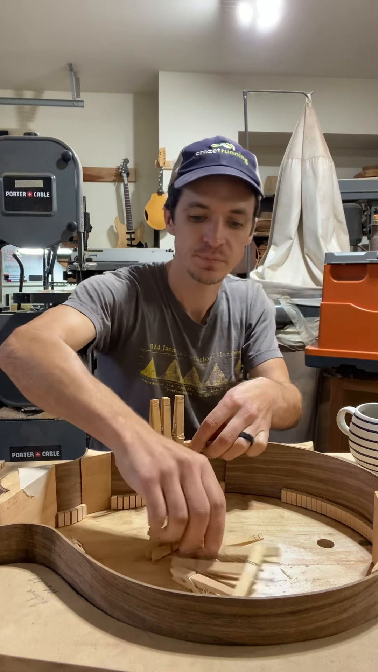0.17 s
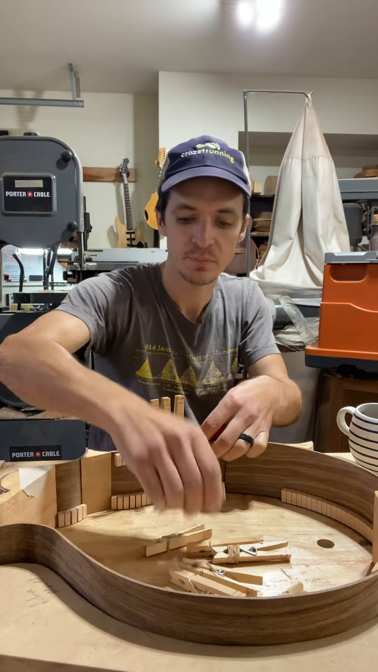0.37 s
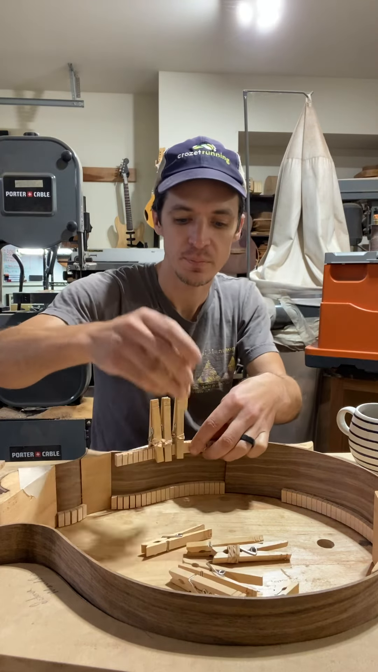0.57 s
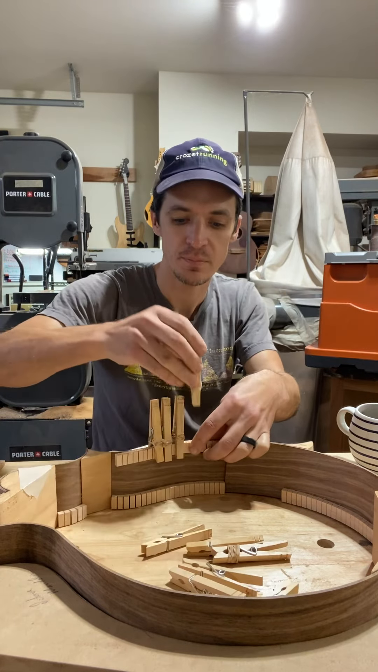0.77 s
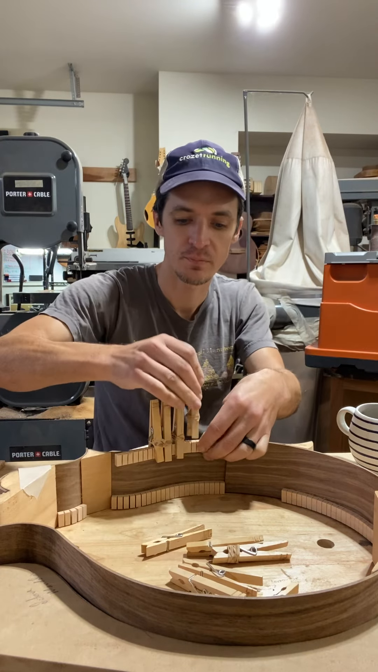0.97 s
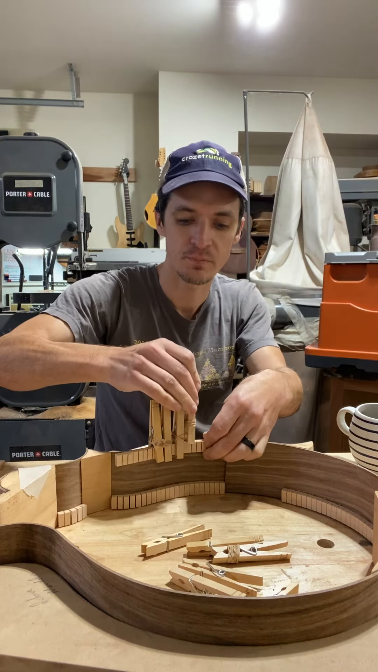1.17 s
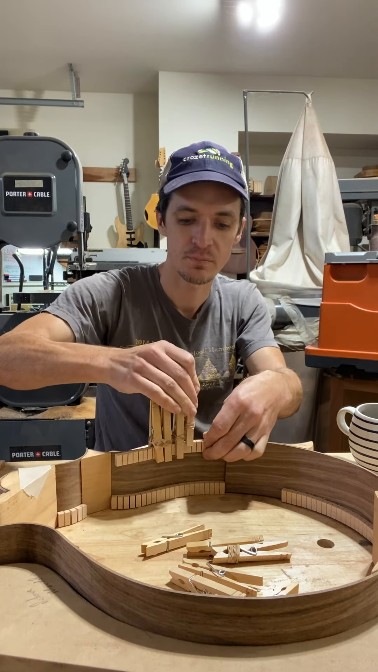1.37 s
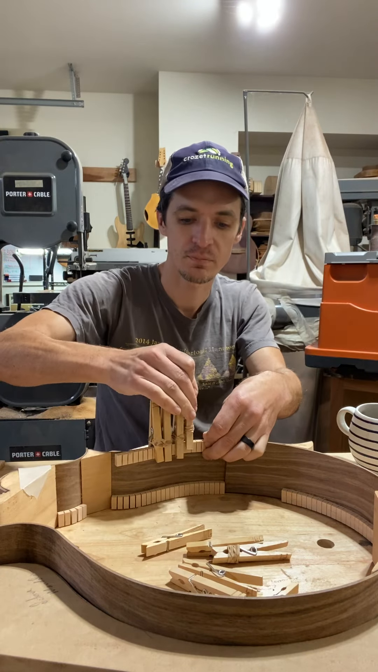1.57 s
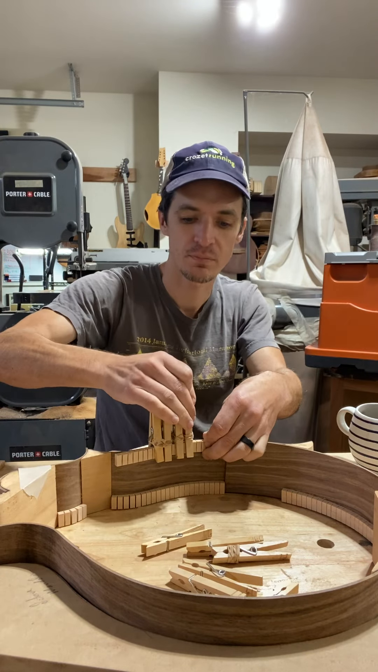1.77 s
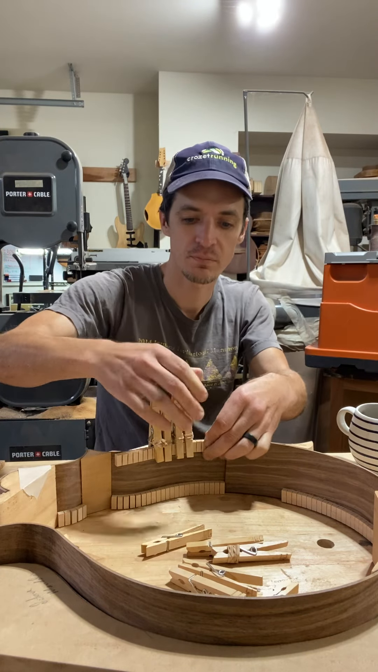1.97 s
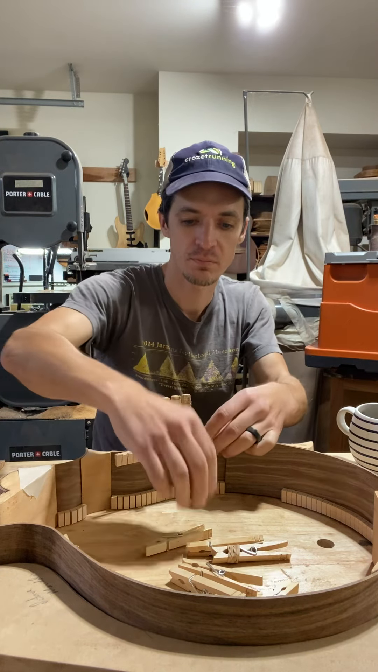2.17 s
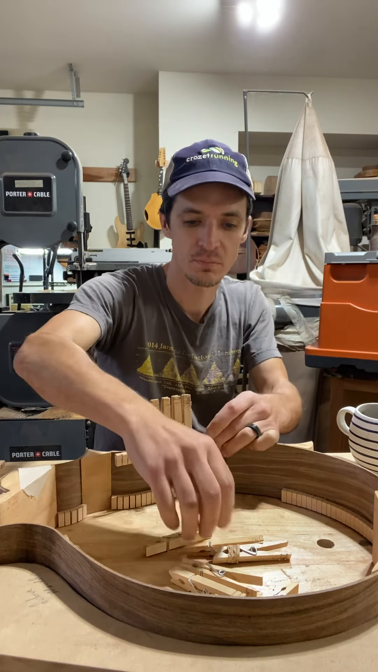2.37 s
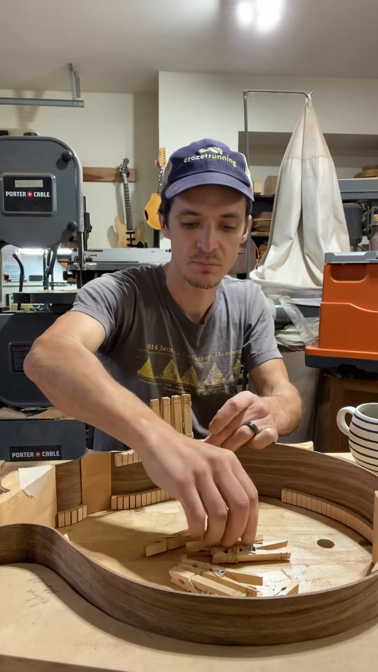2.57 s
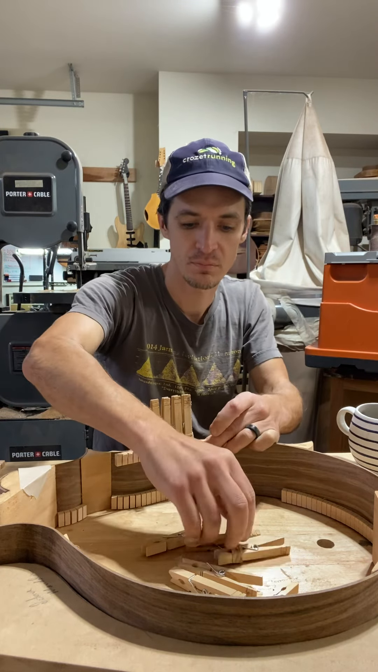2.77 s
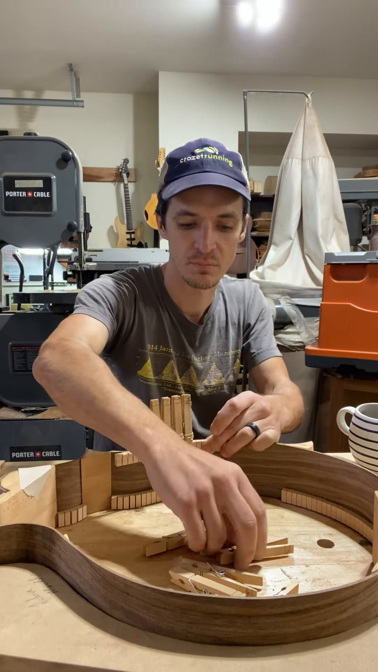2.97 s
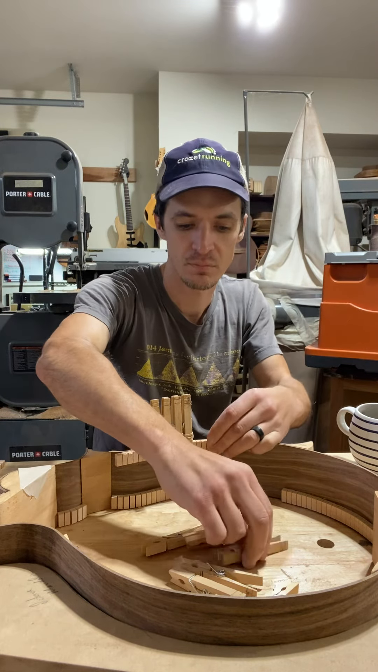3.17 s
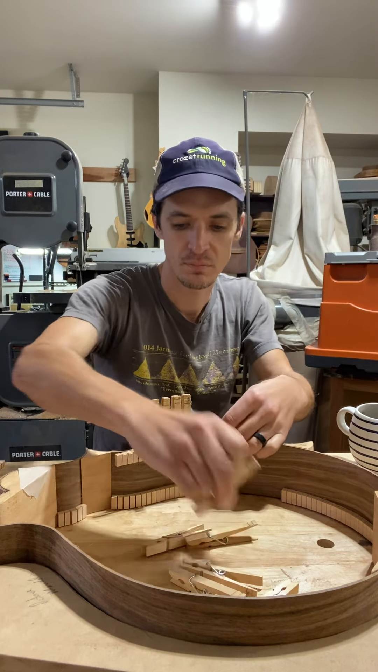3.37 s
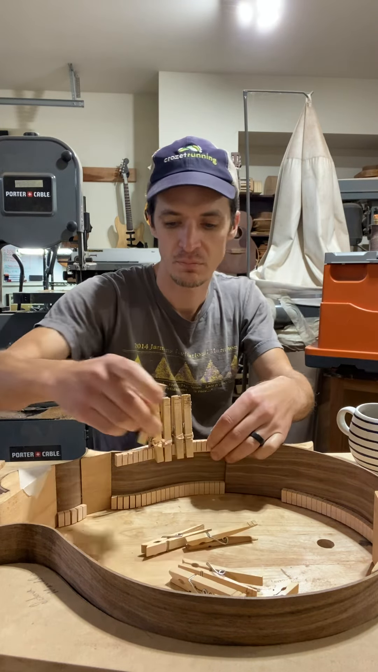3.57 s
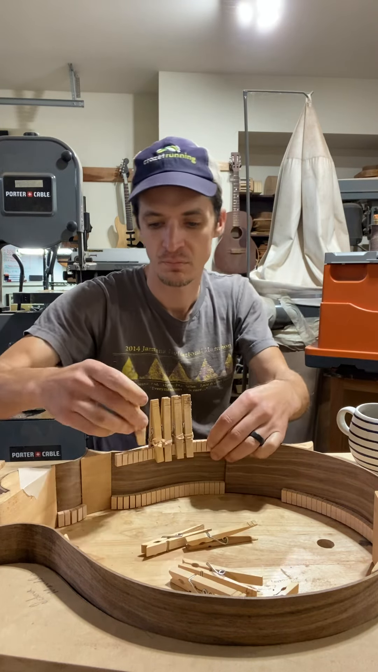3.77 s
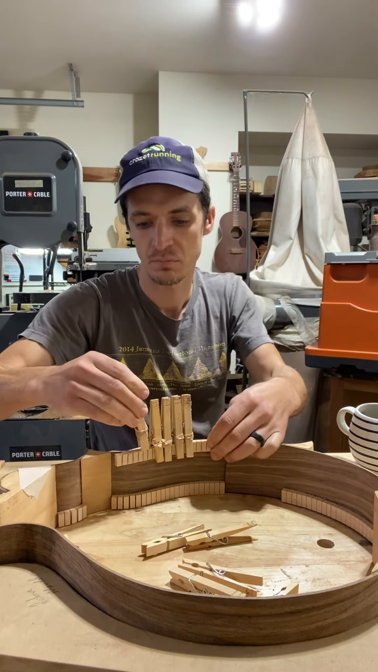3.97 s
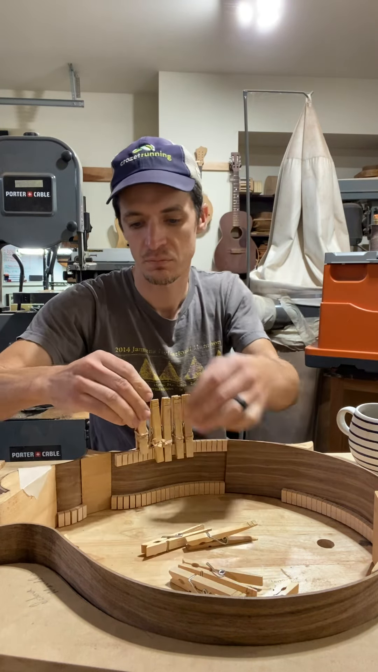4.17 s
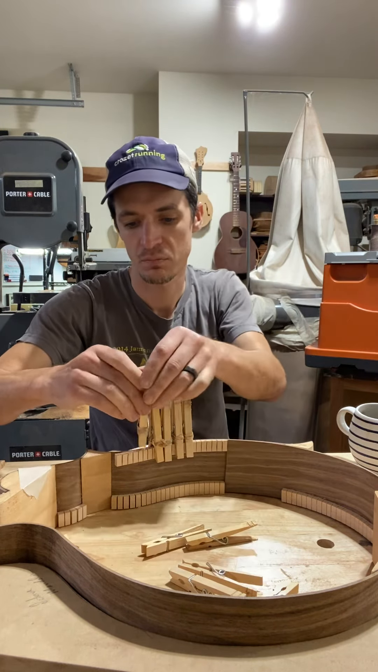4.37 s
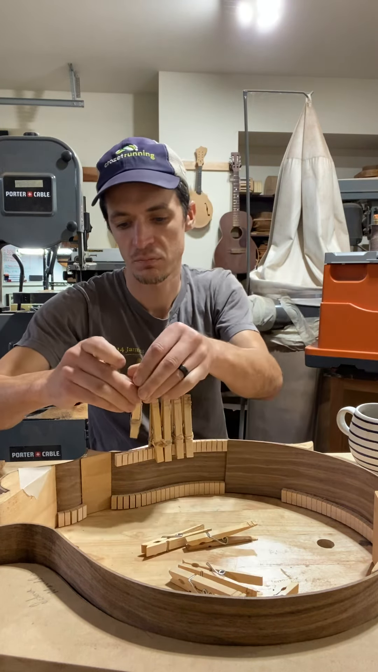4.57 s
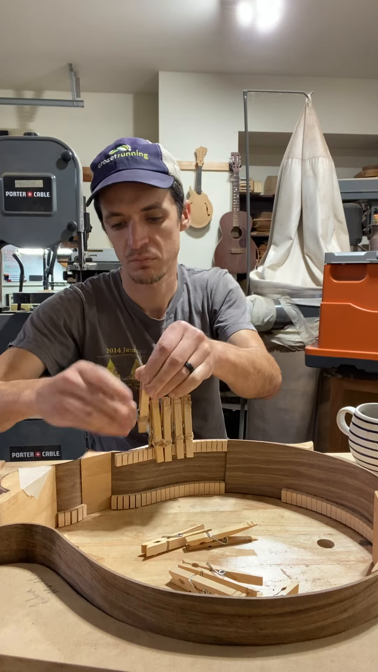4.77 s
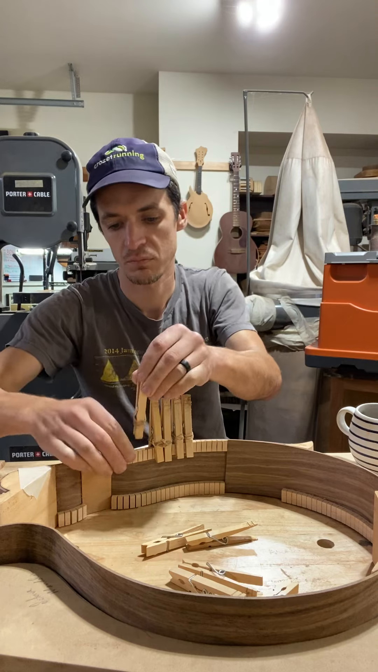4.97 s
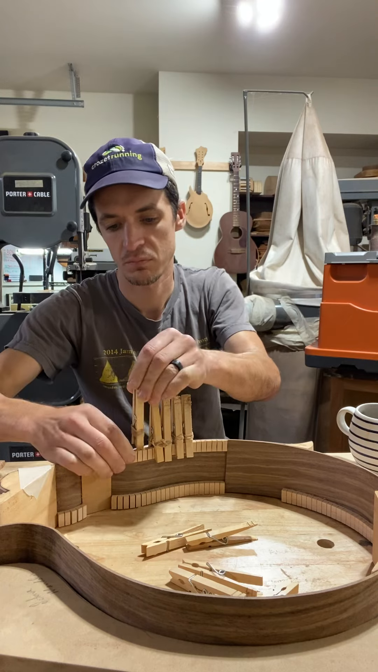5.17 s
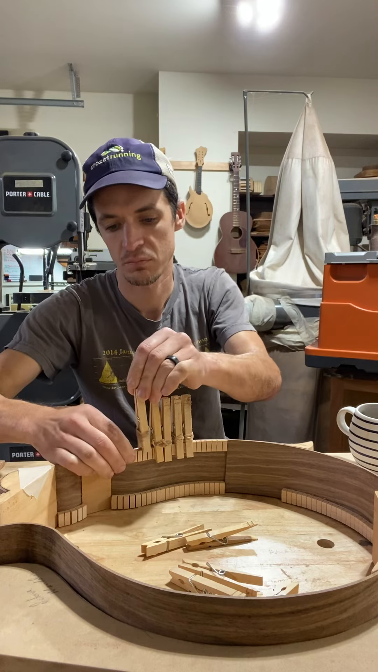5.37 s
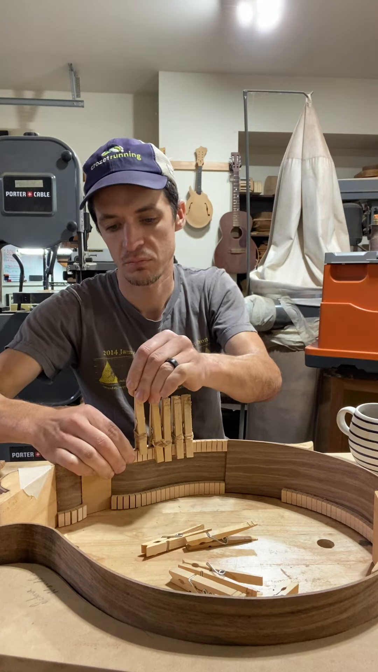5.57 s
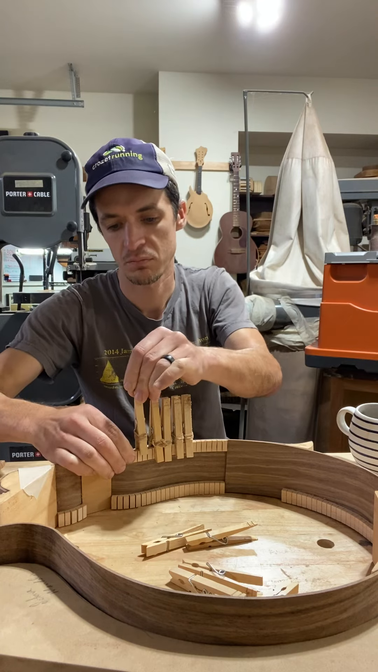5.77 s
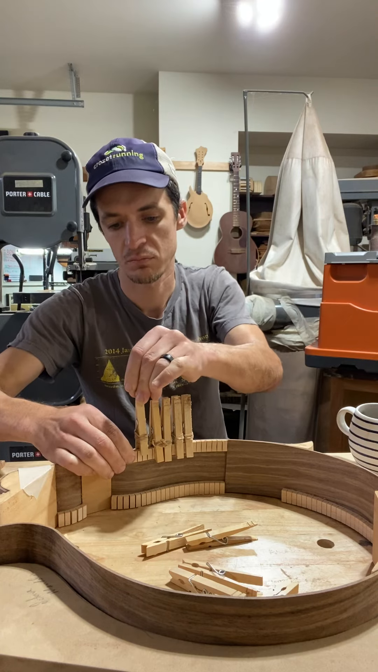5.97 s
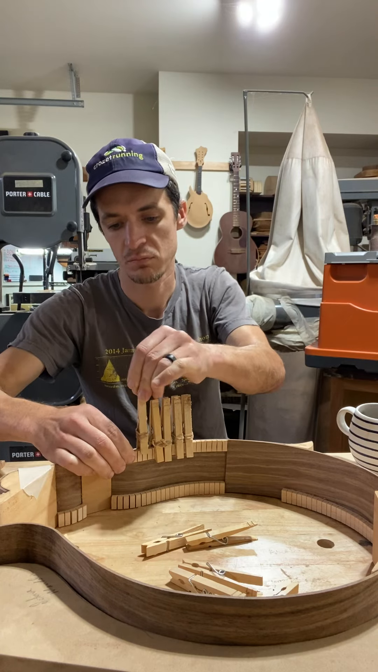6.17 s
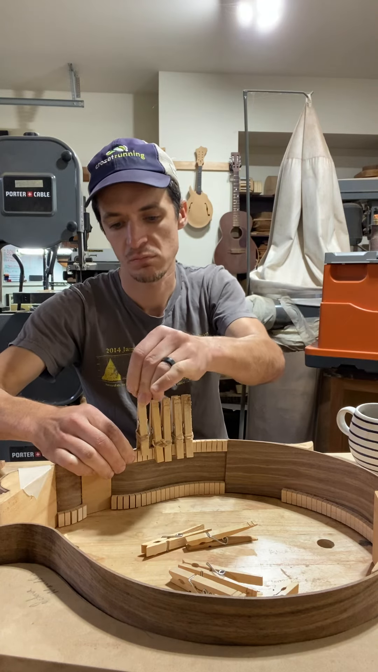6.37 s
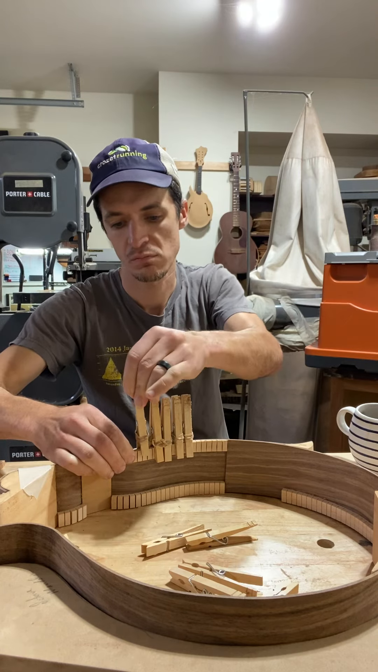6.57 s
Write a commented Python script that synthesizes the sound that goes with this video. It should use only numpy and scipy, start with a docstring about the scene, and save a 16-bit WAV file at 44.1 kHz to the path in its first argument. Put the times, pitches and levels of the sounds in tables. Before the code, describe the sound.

The sound begins abruptly with a loud, bright clatter of wooden clothespins on a thin resonant board: rapid clacks, snaps and rattling, with airy rustle, strongest around 0.1 to 0.3 s, and a smaller flurry at 0.5 to 0.6 s. Near silence follows. At 0.83 to 1.0 s a peg slides with a thin hiss, and a dull knock lands at 1.04, with lesser taps near 1.2. A sharper hissing scrape at 1.6 leads into the firmest seating knock at 1.66; soft rubs and a light tap follow around 1.9 to 2.2. From 2.56 to 3.4 pegs are rummaged again, much more quietly, with one clearer click at 2.75 and finger swishes. Small rim taps come around 4.0 and 4.25, then sparse faint scrapes, a little knock at 5.46 and barely audible touches until 6.6. Close stereo, quiet workshop, faint echoes, wavering low hum.

```python
"""In a workshop, wooden clothes pegs are picked from a pile on a thin wooden plate and pushed onto its bent rim.
Pegs clatter, rattle and scrape on the plate; on the rim they slide with a hiss and seat with a dull knock.
Blows and friction are noisy forces that ring the decaying tones (modes) of plate, rim and pegs.
Shaped, coloured noise makes bright swishes (fingers on wood or rustling clatter) and the spray of knocks.
A low hum wavers over a quiet room with faint echoes; two close microphone ports listen."""
import sys
import numpy as np
from scipy import signal
from scipy.fft import rfft, irfft
from scipy.io import wavfile

SR = 44100
rng = np.random.default_rng(int(sys.argv[2]) if len(sys.argv) > 2 else 0)


def file_out(sig):
    """Save sig as 16-bit WAV at sys.argv[1]."""
    # one column per channel
    cols = np.atleast_2d(sig).T
    # limit, then scale
    lim = np.clip(cols, -1, 1)
    pcm = np.round(lim * 32767).astype(np.int16)
    wavfile.write(sys.argv[1], SR, pcm)


N = 291942  # length in samples

# pegs knocking on the plate: start_s, blow_db, then boom_db, snap_db, tick_db relative to the blow
PLATE_KNOCKS = [(0.015, -29.5, -3, -1.5, -14), (0.049, -33, -16, -17, -4.5), (0.077, -22.5, 1, 5.5, -9),
                (0.101, -23, -4.5, 1, -3), (0.129, -27, -6, -4, -10), (0.159, -23.5, -7.5, 3, 2),
                (0.196, -34, -12, -1, 4), (0.203, -24.5, -9, 0, 3), (0.24, -16, -14.5, -1, -3),
                (0.26, -28.5, -6, -24, -15.5), (0.292, -31.5, -6, 4, 5), (0.297, -20, -11, -7, -30.5),
                (0.318, -32.5, -5.5, -24, -32), (0.355, -34, -27, -11, -35), (0.517, -37, -31, -16, -11.5),
                (0.527, -38, -4, -22, -25), (0.54, -28, -14, -14, -37), (0.561, -34, -6, 7, 1),
                (0.588, -37.5, -14, 4.5, -1), (0.616, -42.5, -7, -0.5, -23.5),
                (2.559, -44.5, -0.5, -6, -28), (2.576, -39.5, -7.5, -10.5, -30.5),
                (2.598, -48, -28, -6, -14), (2.71, -47, -8, 4, -19), (2.736, -41.5, -2.5, -6, -21),
                (2.751, -32.5, -37, 6, -3), (2.767, -42.5, -4, -11, -33), (2.78, -55, -7, 0, -19),
                (2.792, -58, -20, -14, -28), (2.81, -62, -4, -7, 3), (2.84, -52, -6, -6, -16),
                (2.918, -49.5, 7.5, -27, -19), (3.002, -35, -16, -7, -34), (3.022, -45.5, -17, 3.5, -13),
                (3.098, -54, -5, -5, -15), (3.121, -61, -19, -5, 1), (3.13, -53.5, 1.5, 3, -20),
                (3.148, -41, -28, -26, -20), (3.187, -66.5, -16, -9, 18), (3.225, -56, -19, -9, 0),
                (3.275, -39.5, -15, -38, -13)]
# ringing tones of a wooden peg: pitch_hz, level_db, t60_s (time to fall by 60 dB)
PEG_MODES = [(5980, -11, 0.0027), (6520, -4, 0.0058), (6737, -6.5, 0.007), (7040, -4, 0.0047),
             (7900, -3, 0.00249), (9300, -8, 0.002), (12280, -14.5, 0.0017)]
# colour of bright swishing and spraying noise: pitch_hz, relative level_db
BRIGHT_COLOUR = [(1200, -37.5), (2500, -9.5), (5000, 0), (8000, 8.5), (10500, 1.5), (12000, -8.5),
                 (14500, -29)]


def gain_of(db):
    """Turns decibels into a factor."""
    return 10 ** (np.asarray(db) / 20)


def evened(x):
    """Scales a sound to an average (rms) strength of 1."""
    return x / np.sqrt(np.mean(x ** 2) + 1e-20)


def read(points, hz):
    """Reads a table of pitches and values at the frequencies hz."""
    f, value = np.transpose(points)
    return np.interp(np.log(hz + 1), np.log(f + 1), value)


def add(mix, s, sound):
    """Mixes a sound in at time s."""
    part = mix[round(s * SR):][:len(sound)]
    part += sound[:len(part)]


def coloured(x, points):
    """Filters x by a table of pitch_hz and level_db."""
    hz = np.fft.rfftfreq(len(x), 1 / SR)
    return irfft(rfft(x) * gain_of(read(points, hz)), len(x))


def band(modes, lo, hi):
    """Picks the modes from lo to hi Hz."""
    return [m for m in modes if lo <= m[0] < hi]


def ring_of(modes, spread_db, detune):
    """The modes' answer to one tap: fading sines, each shifted and weighted a little by chance."""
    t = np.arange(round(SR * max(m[2] for m in modes)) + 50) / SR
    ring = np.zeros(len(t))
    for hz, db, t60 in modes:
        level_draw, pitch_draw = rng.standard_normal(2)
        fading = gain_of(db + spread_db * level_draw - 60 * t / t60)
        ring += fading * np.sin(2 * np.pi * hz * (1 + detune * pitch_draw) * t)
    return ring


def struck(modes, contact_s, spread_db, detune, rise_s, firm):
    """One blow: a firm touch within a ragged contact rings the modes, which start softly; peak 1."""
    u = np.arange(900) / SR / contact_s
    ring = ring_of(modes, spread_db, detune)
    ring = ring * (1 - np.exp(-np.arange(len(ring)) / SR / rise_s)) ** 2
    force = rng.standard_normal(len(u)) * u * np.exp(-u)
    force[round(contact_s * SR)] = firm * np.linalg.norm(force)
    sound = signal.oaconvolve(ring, force)
    return sound / abs(sound).max()


def knocks(rows, body, boom_top, boom_rise_s):
    """Each knock: the body's low modes boom, the middle ones clack, the upper ones snap, the peg ticks."""
    low, middle, upper = band(body, 0, boom_top), band(body, boom_top, 1290), band(body, 1290, 5200)
    firm_low, firm_high = 1.6, .3  # firm touch against the ragged force, for low and high modes
    out = np.zeros(N)
    for s, blow_db, boom_db, snap_db, tick_db in rows:
        clack = struck(middle, contact_s=.001, spread_db=1.5, detune=.03, rise_s=.0012, firm=firm_low)
        boom = struck(low, contact_s=.0008, spread_db=2.0, detune=.02, rise_s=boom_rise_s, firm=firm_low)
        snap = struck(upper, contact_s=.0014, spread_db=2.0, detune=.04, rise_s=.0003, firm=firm_high)
        tick = struck(PEG_MODES, contact_s=.0013, spread_db=4.0, detune=.05, rise_s=.0001, firm=firm_high)
        for sound, db in [(clack, 0), (boom, boom_db), (snap, snap_db), (tick, tick_db)]:
            add(out, s, gain_of(blow_db + db) * sound)
    return out


def grit(count, per_s, spread_db):
    """A grainy force or noise: dense tiny slips of uneven size and random direction."""
    size = gain_of(spread_db * np.minimum(rng.exponential(1, count), 4))
    direction = rng.choice([-1., 1.], count)
    slips = rng.random(count) < per_s / SR
    return evened(size * direction * slips)


def swell_and_fade(swell, hold, fade):
    """The strength of a rub, rattle or swish swells, holds and fades, fluttering a little."""
    foot_db, tail_db = -13.5, -24.5  # start and end of the curve, relative to the held level
    flutter_db, flutter_s, ease_s = 3.2, .007, .012  # flutter size and step, final fade to silence
    corners = np.cumsum([0, swell, hold, fade])
    t = np.arange(0, corners[-1], 1 / SR)
    knots = np.arange(0, 1.2, flutter_s)
    flutter = np.interp(t, knots, rng.standard_normal(len(knots)))
    shape = gain_of(np.interp(t, corners, [foot_db, 0, 0, tail_db]) + flutter_db * flutter)
    fade_in = np.minimum(t / corners[1] * 2, 1)
    fade_out = np.minimum((corners[-1] - t) / ease_s, 1)
    return shape * fade_in * fade_out


def ringing(force, ring, rise_s):
    """A steady force drives a ring; a soft contact (rise_s) keeps the gaps between its modes dark."""
    ring = ring * (1 - np.exp(-np.arange(len(ring)) / SR / rise_s))
    return signal.oaconvolve(force, ring / np.linalg.norm(ring))[:len(force)]


def shifting(force, modes, rise_s):
    """As the peg moves, its ring passes back and forth between two grips."""
    regrip_s = .2  # from one grip to the other and back, twice
    turn = 2 * np.pi * (np.arange(len(force)) / SR / regrip_s + rng.random())
    one = ringing(force * np.cos(turn), ring_of(modes, 2.0, .025), rise_s)
    other = ringing(force * np.sin(turn), ring_of(modes, 2.0, .025), rise_s)
    return one + other


def gritty_contacts(rows, body, groan_low):
    """A gritty force rings the peg (hiss) and the body: from its low modes up, groan, scrape, creak, rasp."""
    edges = [groan_low, 700, 1290, 2700, 5200]  # Hz
    parts = [band(body, lo, hi) for lo, hi in zip(edges, edges[1:])]
    fine, coarse = grit(N, 8000, spread_db=2.0), grit(N, 2200, spread_db=2.0)
    out = np.zeros(N)
    lead = SR // 20  # samples that let the ring build up before the contact is heard
    for s, swell, hold, fade, peg_hz, hiss_db, *wood_db in rows:
        shape = swell_and_fade(swell, hold, fade)
        at = (round(s * SR) + np.arange(-lead, len(shape))) % N
        # the peg pitch places the second mode; the others keep their ratio to it
        peg = [(hz * peg_hz / PEG_MODES[1][0], db, t60) for hz, db, t60 in PEG_MODES]
        sound = gain_of(hiss_db) * ringing(fine[at], ring_of(peg, 2.0, .01), rise_s=.0001)
        for modes, db, rise_s in zip(parts, wood_db, [.002, .0049, .000053, .00088]):
            sound = sound + gain_of(db) * shifting(coarse[at], modes, rise_s)
        add(out, s, shape * sound[lead:])
    return out


def pegs_on_plate():
    """Pegs clatter, rattle and scrape on the thin plate, whose modes ring with every contact."""
    # ringing tones of the plate: pitch_hz, level_db, t60_s
    plate_modes = [(216, -9, .12), (263, -5, .12), (320, -8, .08), (380, -5, .08), (454, -2, .06),
                   (529, -2, .06), (655, -3, .03), (850, 0, .018), (1030, 1, .017), (1180, -3, .014),
                   (1400, 1, .011), (1600, 2, .011), (1870, 1, .012), (2100, -2, .008), (2350, -3, .007),
                   (2600, -3, .006), (2870, -3, .006), (3200, -4, .005), (3550, -5, .004), (3950, -5, .004),
                   (4400, -7, .003), (4900, -8, .003)]
    # pegs rattling after knocks, scraping or briefly ticking on the plate:
    # start_s, swell_s, hold_s, fade_s, peg_pitch_hz, hiss_db, groan_db, scrape_db, creak_db, rasp_db
    rattles_and_scrapes = [(0, 0.0007, 0.024, 0.15, 6460, -54.5, -39.5, -47, -46, -50.5),
                           (.078, 0.0017, 0.024, 0.16, 6400, -47, -39, -39.5, -36, -54),
                           (.157, 0.0058, 0.0093, 0.016, 6170, -61, -31.5, -32.5, -31, -41),
                           (.203, 0.0016, 0.0051, 0.091, 6910, -66, -33, -58, -39.5, -48.5),
                           (.243, 0.0045, 0.015, 0.049, 6480, -50.5, -38.5, -35, -38.5, -53.5),
                           (.293, 0.0018, 0.0018, 0.25, 6900, -51, -58, -47, -43, -64),
                           (.516, 0.0045, 0.016, 0.083, 7660, -65, -46.5, -44.5, -56, -62.5),
                           (2.557, 0.00095, 0.015, 0.068, 6440, -69, -67, -60, -62.5, -91.5),
                           (2.66, 0.019, 0.033, 0.083, 6460, -66.5, -59.5, -60.5, -74, -87),
                           (2.752, 0.0029, 0.0097, 0.088, 6800, -80, -64, -60, -54.5, -83),
                           (2.915, 0.0084, 0.099, 0.014, 7160, -71.5, -62.5, -64.5, -73.5, -81),
                           (2.995, 0.015, 0.13, 0.042, 6070, -64.5, -64, -71, -65.5, -72),
                           (3.146, 0.0033, 0.0053, 0.012, 7400, -55.5, -74, -73, -74, -80),
                           (3.17, 0.041, 0.054, 0.066, 6270, -55, -58, -59, -66, -64),
                           (3.27, 0.005, 0.0073, 0.083, 6300, -92, -74, -64, -58.5, -65),
                           (3.358, 0.0062, 0.018, 0.083, 7570, -64.5, -67, -89, -84, -89)]
    clatter = knocks(PLATE_KNOCKS, plate_modes, boom_top=600, boom_rise_s=.002)
    return clatter + gritty_contacts(rattles_and_scrapes, plate_modes, groan_low=0)


def swishes():
    """Bright, fine-grained noise: fingers brushing wood, or the airy rustle of the clatter."""
    # bright swishes of either kind: start_s, swell_s, hold_s, fade_s, swish_db
    swish_rows = [(0, 0.076, 0.028, 0.077, -57), (0.145, 0.018, 0.047, 0.13, -47.5),
                  (0.6, 0.011, 0.0073, 0.14, -68), (0.66, 0.016, 0.0052, 0.32, -75.5),
                  (1.658, 0.009, 0.0041, 0.17, -65), (1.918, 0.016, 0.021, 0.35, -71.5),
                  (2.077, 0.026, 0.0092, 0.22, -82), (2.164, 0.041, 0.0052, 0.18, -82),
                  (2.62, 0.066, 0.0045, 0.074, -68.5), (2.749, 0.0079, .005, 0.13, -65),
                  (2.907, 0.022, 0.0029, 0.021, -71), (2.951, 0.057, 0.25, 0.24, -66),
                  (3.337, 0.021, 0.021, 0.43, -75), (3.495, 0.012, 0.0042, 0.038, -64),
                  (3.544, 0.018, 0.009, 0.5, -80.5), (3.681, 0.079, 0.0048, 0.065, -67),
                  (3.79, 0.039, 0.0092, 0.071, -77.5), (3.91, 0.029, 0.052, 0.026, -75),
                  (4.008, 0.017, 0.0049, 0.079, -74.5), (4.154, 0.0098, .003, 0.043, -70.5),
                  (4.202, 0.019, 0.0077, 0.45, -71.5), (4.314, 0.037, 0.016, 0.07, -71.5),
                  (4.476, 0.053, 0.06, .2, -80), (4.641, .013, 0.05, 0.063, -76),
                  (4.842, 0.081, 0.0033, 0.042, -76), (4.93, 0.056, 0.0065, 0.086, -72.5),
                  (5.036, 0.059, 0.0028, 0.03, -78.5), (5.33, 0.046, 0.0095, 0.18, -81),
                  (5.436, 0.014, 0.0051, 0.15, -77)]
    level = np.zeros(N)
    for s, swell, hold, fade, swish_db in swish_rows:
        add(level, s, gain_of(swish_db) * swell_and_fade(swell, hold, fade))
    return level * evened(coloured(grit(N, 4000, spread_db=3.0), BRIGHT_COLOUR))


def hum():
    """A hum of two fuzzy tones; the lower one wavers by a level curve."""
    # strength of the lower tone: time_s, level_db
    hum_curve = [(0.0, -49), (0.05, -58), (0.15, -67), (0.35, -54), (0.877, -64), (1.069, -51.5),
                 (1.349, -60.5), (1.62, -52.5), (1.881, -65.5), (2.511, -58), (2.649, -71), (2.711, -59),
                 (4.07, -70.5), (4.2, -61.5), (5.55, -68.5), (5.62, -60.5), (5.68, -73.5), (6.62, -66)]
    s, hum_db = np.transpose(hum_curve)
    level = gain_of(np.interp(np.arange(N) / SR, s, hum_db))
    lower = level * wobble(60.7, width=13, steady=.8)
    return lower + gain_of(-67.5) * wobble(117.8, width=19, steady=.26)


def wobble(hz, width, steady):
    """A fuzzy tone: slow noise (smoothed by width, in Hz) on a sine; steady 0-1 evens its strength."""
    r = np.exp(-np.pi * width / SR)
    slow = rng.standard_normal(N) + 1j * rng.standard_normal(N)
    for _ in range(2):
        slow = signal.lfilter([1], [1, -r], slow)
    slow = slow / abs(slow) ** steady
    return evened((slow * np.exp(2j * np.pi * hz * np.arange(N) / SR)).real)


def air():
    """Still air of the shop: steady coloured noise."""
    # colour of the air noise: pitch_hz, relative level_db
    air_colour = [(25, -29), (50, 2.5), (100, 7.5), (160, 3.5), (250, 2.5), (400, -7), (630, -16),
                  (1000, -23), (2000, -27), (4000, -32), (6300, -29.5), (10000, -30.5), (12500, -52),
                  (14300, -54.5)]
    return gain_of(-67) * evened(coloured(rng.standard_normal(N), air_colour))


def sprays():
    """Each knock on the plate brings a short bright burst of noise, set by the level of its tick."""
    spray_db, rise_s, t60 = -15, .0029, .041  # dB relative to the tick, s, s
    t, level = np.arange(SR // 10) / SR, np.zeros(N)
    for s, blow_db, boom_db, snap_db, tick_db in PLATE_KNOCKS:
        fading = gain_of(blow_db + tick_db + spray_db - 60 * t / t60)
        add(level, s, fading * np.minimum(t / rise_s, 1))
    return level * evened(coloured(rng.standard_normal(N), BRIGHT_COLOUR))


def shop_echoes(x):
    """Echoes of the shop: sparse taps of random sign, each band dying at its own speed."""
    # how long echoes last: pitch_hz, t60_s
    echo_times = [(150, 0.36), (500, 0.4), (1500, 0.46), (4500, 0.37), (7000, 0.05), (11000, 0.14)]
    # strength of the echoes as the ports hear them: pitch_hz, level_db
    echo_colour = [(200, 0.5), (1500, -6), (3000, -4), (4500, 0), (6500, -6), (10000, -1)]
    taps = np.zeros(SR)
    at = np.arange(200, SR - 20, 20)
    taps[at + rng.integers(0, 20, len(at))] = rng.choice([-1., 1.], len(at))
    hz, t, z = signal.stft(taps, SR, nperseg=256)
    fading = gain_of(-60 * t / read(echo_times, hz)[:, None])
    tail = signal.istft(z * fading, SR, nperseg=256)[1]
    return coloured(signal.oaconvolve(x, tail / np.linalg.norm(tail))[:N], echo_colour)


def pegs_on_rim():
    """Pegs slide and seat on the bent rim, whose modes give a dull knock."""
    # ringing tones of the rim: pitch_hz, level_db, t60_s
    rim_modes = [(155, 9, 0.05), (203, 16, 0.065), (250, 8, 0.09), (300, 5, .04), (371, 2, .045),
                 (452, 4, 0.045), (500, 2, .035), (610, 4, 0.035), (672, 3, .03), (745, 4, 0.02),
                 (825, 4, 0.018), (950, 1, 0.012), (1500, -6, .006), (1950, 4, 0.013), (2170, 0, 0.008),
                 (2500, -5, .005), (2900, -3, .004), (3420, 4, 0.007), (3800, 0, .004), (4400, 0, 0.005),
                 (4900, -1, .004)]
    # pegs seating or tapping: start_s, blow_db, then boom_db, snap_db, tick_db relative to the blow
    seats = [(1.044, -34, -0.5, -38, -27), (1.105, -62, 4.5, -14, -7), (1.171, -45, -2, -21, -7),
             (1.208, -43.5, -1, -16.5, -19), (1.216, -37, -4, -25, -12), (1.663, -26.5, 1, -24, -11),
             (1.901, -47.5, 1.5, -14, -27), (2.03, -67, -1, 0, 22), (2.052, -79, 8, -4, 30.5),
             (2.058, -68.5, -10.5, -14.5, 15.5), (4.018, -53, -12, -11.5, -8.5),
             (4.042, -49.5, -19, -19.5, -17.5), (4.23, -51, -18, -20, -24), (4.251, -38, -8, -20, -27),
             (4.264, -42, -14, -15, -25), (4.284, -50.5, 7.5, -19.5, -28), (4.953, -59.5, -7, -15.5, -15),
             (5.098, -64, 16.5, -14.5, -6), (5.262, -57, 1.5, -18.5, 8.5), (5.465, -41, -6.5, -19, -14),
             (5.524, -63.5, -9.5, -4.5, -8.5), (6.04, -68, -8, 0.5, 7), (6.07, -52, -17.5, -7, -4.5),
             (6.185, -62, -12, -6.5, -11.5), (6.22, -69.5, -9.5, -4, 1), (6.46, -61, -13, -16, -26),
             (6.478, -59.5, -14.5, -19, -25.5), (6.553, -61, -15, -6, -5.5)]
    # pegs sliding on the rim: start_s, swell_s, hold_s, fade_s, peg_pitch_hz,
    # hiss_db, groan_db, scrape_db, creak_db, rasp_db
    strokes = [(.832, 0.012, 0.16, 0.043, 6020, -57, -79, -64.5, -66.5, -67),
               (.95, 0.083, 0.0052, 0.048, 6300, -53.5, -63.5, -58.5, -63, -60),
               (1.08, 0.0096, 0.0034, 0.19, 6400, -69.5, -58.5, -63, -78.5, -79),
               (1.19, 0.026, 0.0033, 0.042, 6170, -59, -53.5, -44, -65.5, -68.5),
               (1.37, 0.033, 0.014, 0.037, 6200, -82, -69, -74, -85, -87.5),
               (1.445, 0.019, 0.029, 0.058, 6250, -51, -61.5, -60, -60, -62),
               (1.59, 0.06, 0.019, 0.0093, 6240, -38.5, -61, -48, -49.5, -50.5),
               (1.66, 0.0049, 0.0031, 0.13, 6630, -56, -42.5, -56, -59, -60),
               (1.85, 0.02, 0.0067, 0.034, 5850, -58.5, -68.5, -62, -59.5, -66.5),
               (1.885, 0.021, 0.0039, 0.11, 6500, -82, -62, -60, -67, -84),
               (1.92, 0.056, .005, 0.1, 6000, -59, -65.5, -66, -63.5, -68),
               (2.092, 0.021, 0.0019, 0.029, 6850, -62, -75.5, -65.5, -67.5, -64.5),
               (2.115, 0.02, 0.027, 0.19, 6000, -66.5, -65, -66, -70.5, -68),
               (2.18, 0.012, 0.028, 0.062, 7700, -71.5, -80, -72, -73, -76),
               (3.495, 0.011, 0.02, 0.059, 6120, -57.5, -60, -64.5, -64, -64.5),
               (3.91, 0.057, 0.025, 0.035, 6020, -64, -86.5, -81, -77, -79.5),
               (4.005, 0.018, 0.0031, 0.021, 5970, -65, -70, -53, -65.5, -66.5),
               (4.03, 0.013, 0.0016, 0.039, 5580, -68, -68.5, -56, -62, -76.5),
               (4.15, 0.014, 0.0046, 0.053, 6370, -63.5, -60, -68, -74, -66),
               (4.2, 0.019, 0.072, 0.0075, 6450, -63.5, -61, -66, -76.5, -69),
               (4.227, 0.0034, 0.057, 0.03, 6500, -85.5, -49.5, -63.5, -63, -75.5),
               (4.31, 0.035, 0.006, 0.046, 6300, -74, -77, -91.5, -92, -87),
               (4.94, 0.016, 0.038, 0.039, 6100, -66.5, -66.5, -55, -69.5, -67.5),
               (5.085, 0.011, 0.0093, 0.029, 6100, -80, -67, -82, -72.5, -81),
               (5.135, 0.0056, 0.009, 0.014, 6110, -84, -72, -88, -80.5, -83.5),
               (5.23, 0.015, 0.027, 0.032, 6380, -65.5, -60.5, -61.5, -69, -69),
               (5.338, 0.011, 0.084, 0.061, 6700, -73.5, -81.5, -97, -91.5, -91.5),
               (5.452, 0.011, 0.004, 0.046, 6040, -73.5, -54.5, -53.5, -67, -75),
               (5.495, 0.02, 0.07, 0.03, 6130, -74, -66.5, -80, -72.5, -82.5),
               (5.63, 0.021, 0.021, 0.13, 6500, -85, -81, -73, -95.5, -95),
               (5.734, 0.015, 0.0027, 0.046, 6370, -79, -81.5, -70, -85.5, -89),
               (6.03, 0.041, 0.023, 0.047, 6170, -72, -70, -60.5, -70.5, -77),
               (6.262, 0.034, 0.01, 0.072, 6130, -82.5, -69.5, -66, -74, -86.5),
               (6.44, 0.018, 0.0046, 0.06, 6300, -92.5, -76, -70.5, -94.5, -96),
               (6.51, 0.041, 0.033, 0.1, 6240, -85, -72, -66.5, -77, -81)]
    seating = knocks(seats, rim_modes, boom_top=330, boom_rise_s=.004)
    return seating + gritty_contacts(strokes, rim_modes, groan_low=330)


def scene():
    """Adds all sounds at the mid-point of the ports, and their difference across the ports."""
    # response of the ports to near sounds: pitch_hz, level_db
    port_colour = [(40, -29), (130, -2.5), (220, -2), (10000, 0), (11500, 4.5), (13000, -10.5),
                   (14300, -18)]
    # size of the difference between the ports: pitch_hz, side_db relative to the mid
    side_width = [(60, -30.5), (91, -23.5), (140, -17), (210, -21.5), (320, -12.5), (480, -8.5), (730, -7),
                  (1110, -8), (1680, -11), (2550, -4.5), (3870, -8.5), (5860, -17.5), (8890, -8),
                  (13500, 10.5)]
    # how much of that difference follows the mid: pitch_hz, share (0-1)
    side_lean = [(100, 0.87), (500, 0.77), (2000, 0.3), (6000, .2), (12000, 0.3)]
    plate = pegs_on_plate() + swishes() + sprays()
    rim = pegs_on_rim()
    near, low_hum = coloured(plate + rim, port_colour), hum()
    echoed = coloured(plate + gain_of(-6) * rim, port_colour)  # the rim is heard drier than the plate
    mid = near + gain_of(-5) * shop_echoes(echoed) + low_hum + air()
    # across the ports the direct sound is a quarter turn off; echoes and air are unrelated
    quarter_turn = signal.hilbert(near + low_hum).imag
    across = quarter_turn + gain_of(2.5) * shop_echoes(echoed) + gain_of(11.5) * air()
    hz = np.fft.rfftfreq(N, 1 / SR)
    lean = read(side_lean, hz)
    blend = lean * rfft(mid) + np.sqrt(1 - lean ** 2) * rfft(across)
    side = irfft(gain_of(read(side_width, hz)) * blend, N)
    return np.array([mid + side, mid - side])


def record(dry):
    """The band limit: a steep filter removes what lies above about 14300 Hz."""
    low_pass = signal.firwin(511, 14300, window=("kaiser", 9), fs=SR)
    return signal.oaconvolve(dry, low_pass[None], "same")


dry = scene()
out = record(dry)
file_out(out)
```